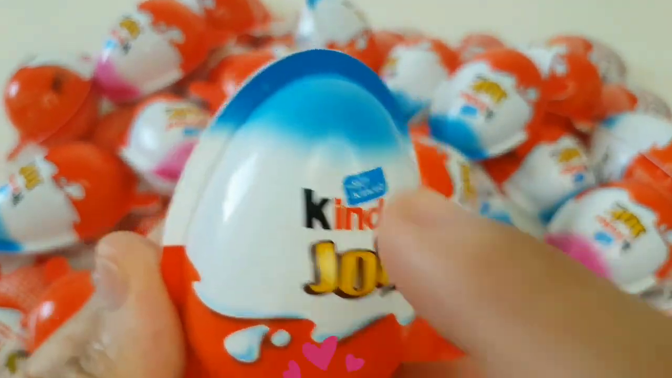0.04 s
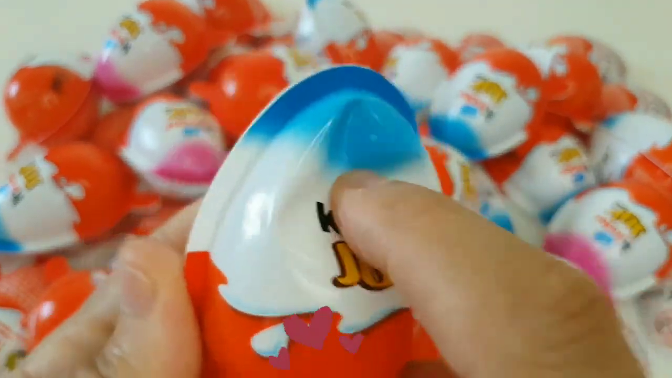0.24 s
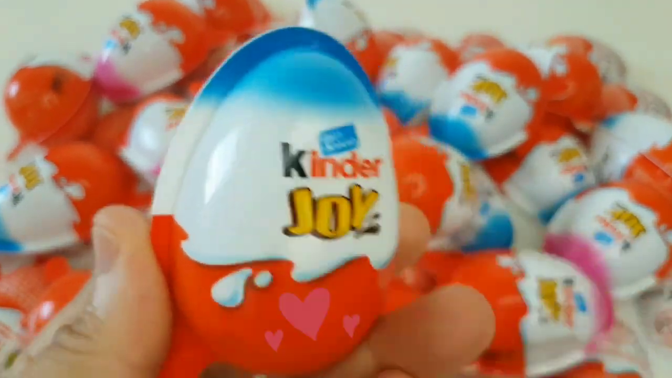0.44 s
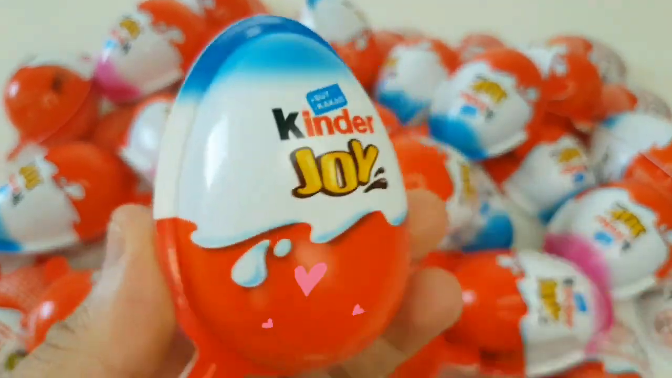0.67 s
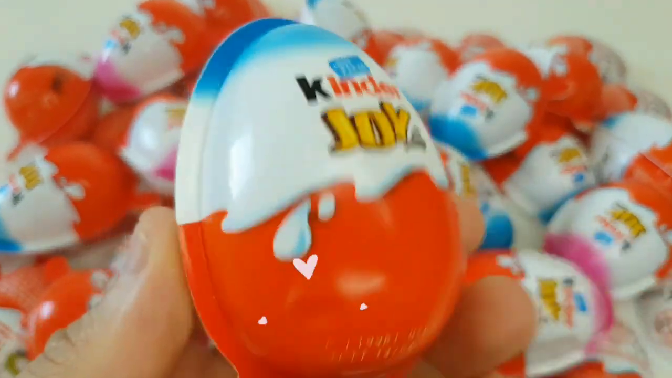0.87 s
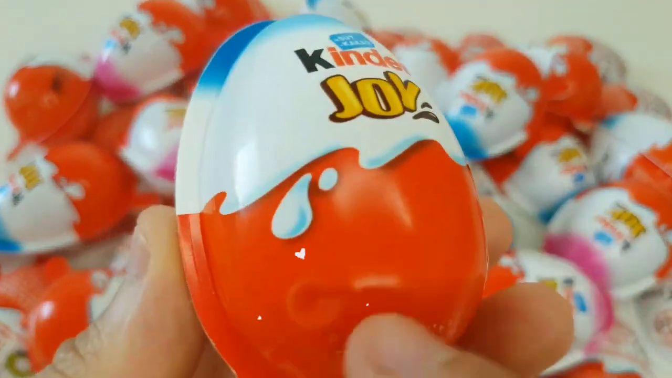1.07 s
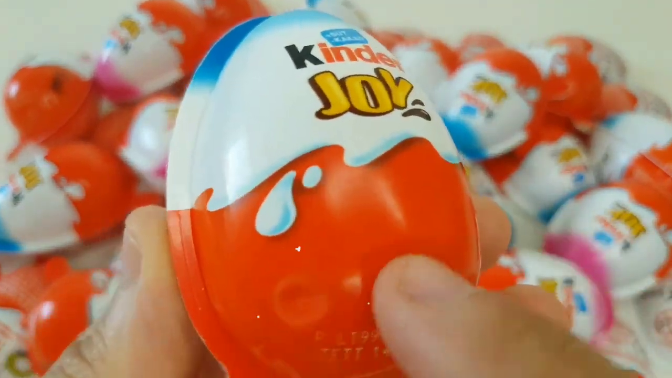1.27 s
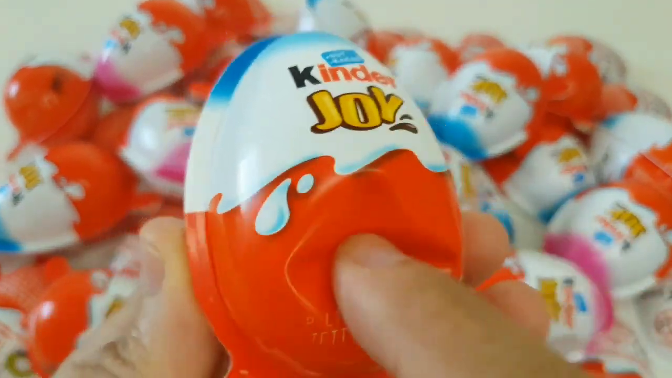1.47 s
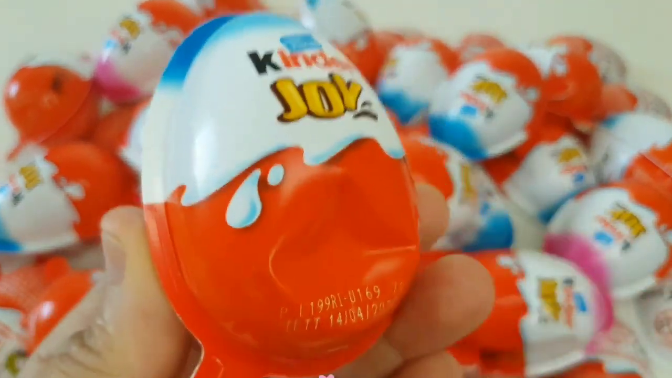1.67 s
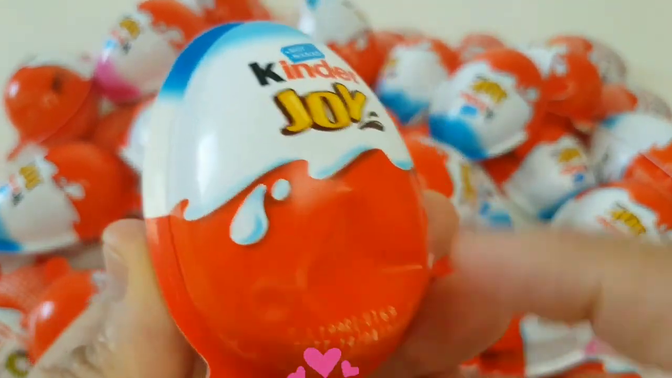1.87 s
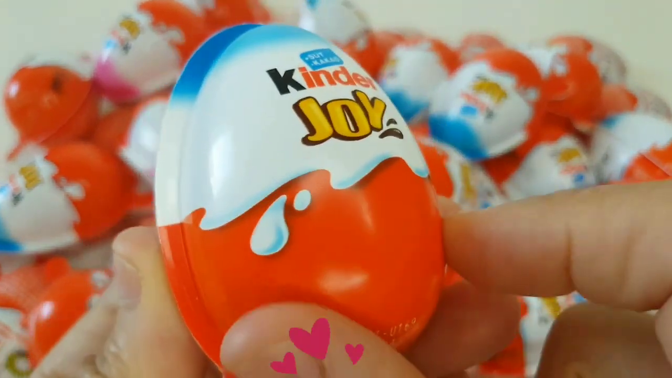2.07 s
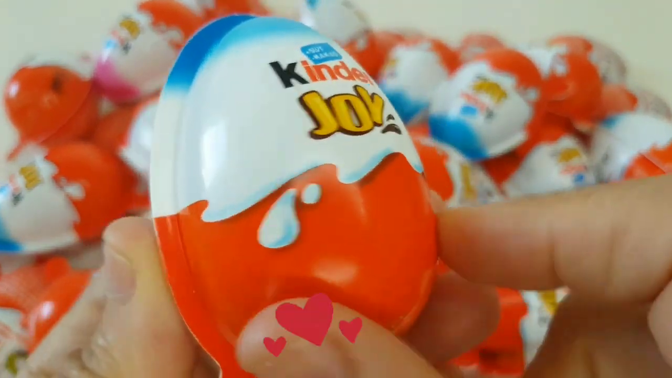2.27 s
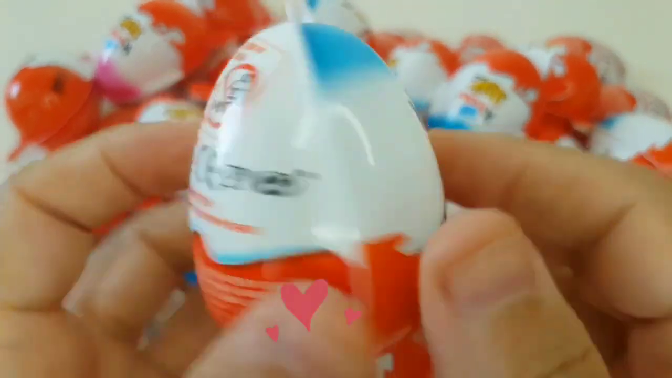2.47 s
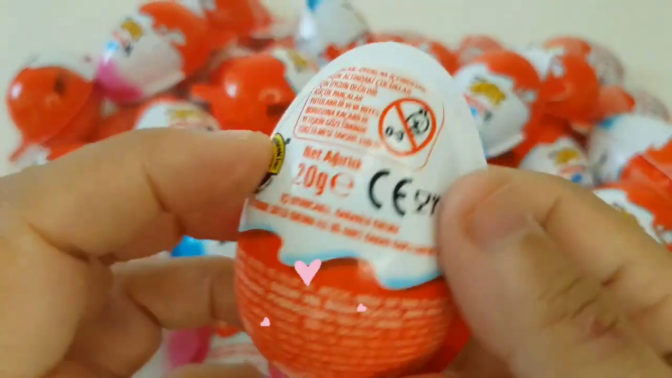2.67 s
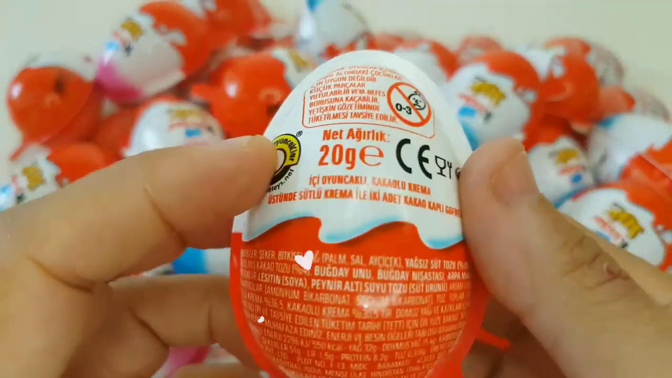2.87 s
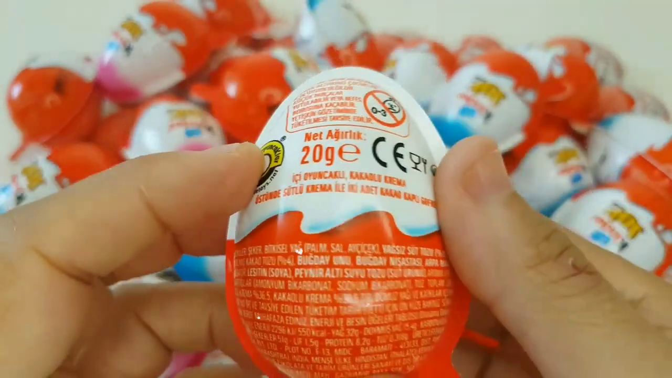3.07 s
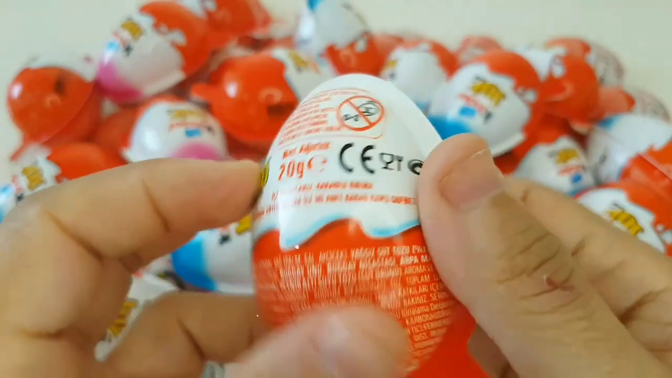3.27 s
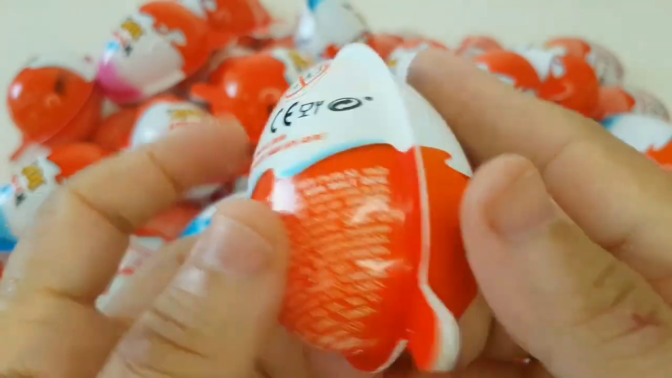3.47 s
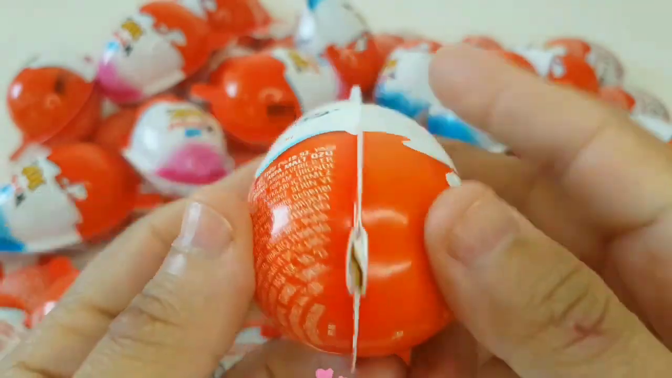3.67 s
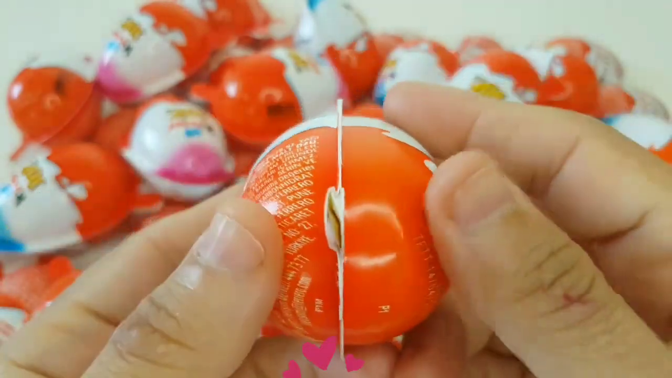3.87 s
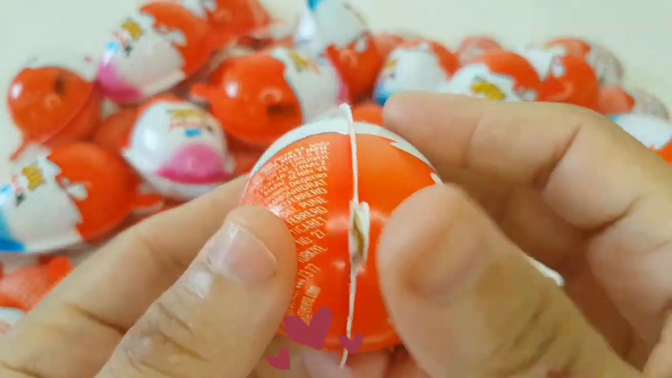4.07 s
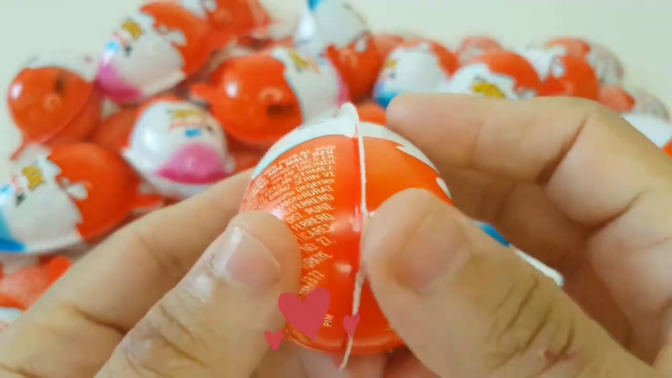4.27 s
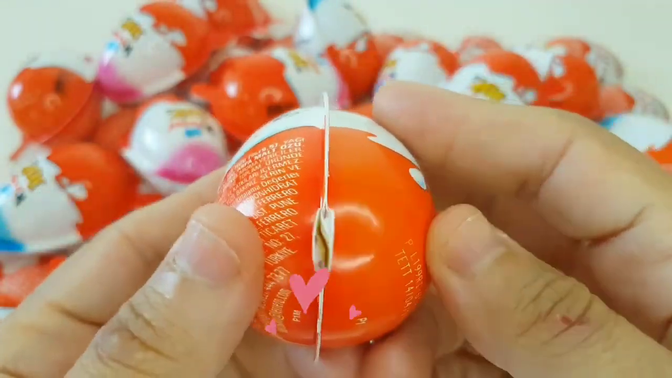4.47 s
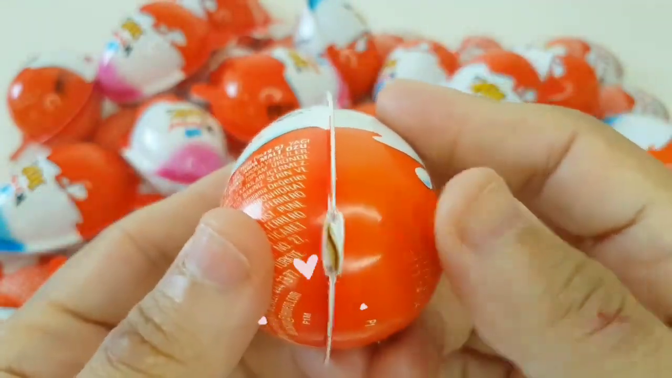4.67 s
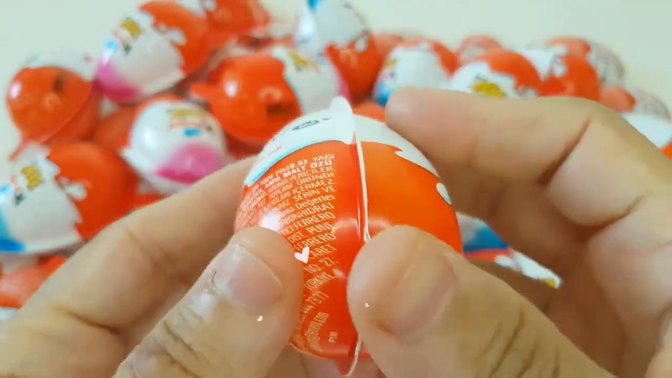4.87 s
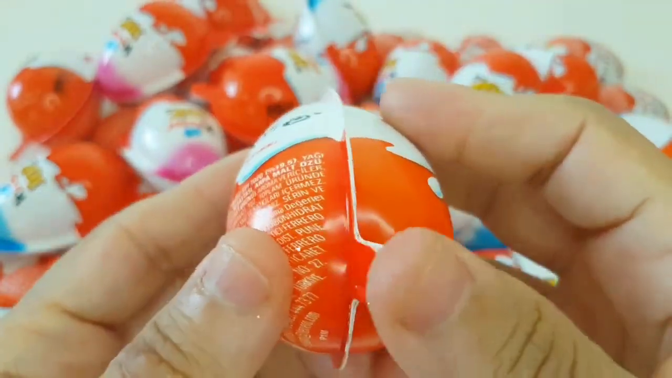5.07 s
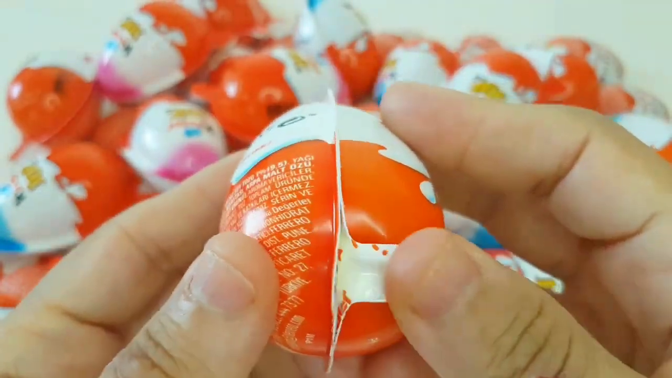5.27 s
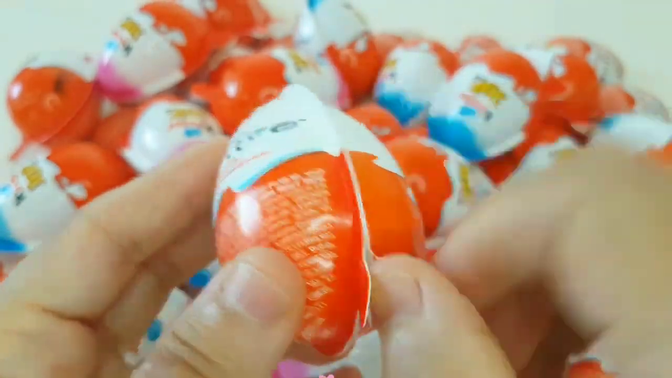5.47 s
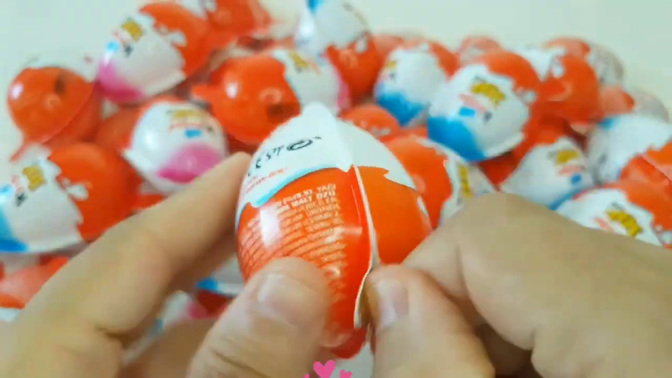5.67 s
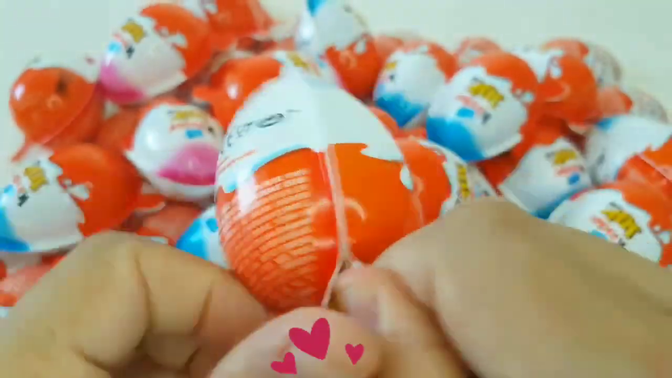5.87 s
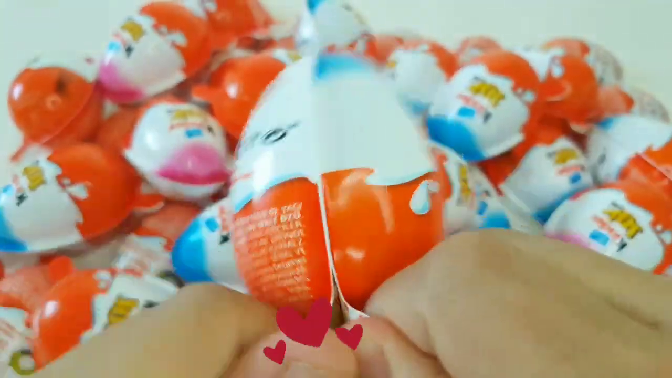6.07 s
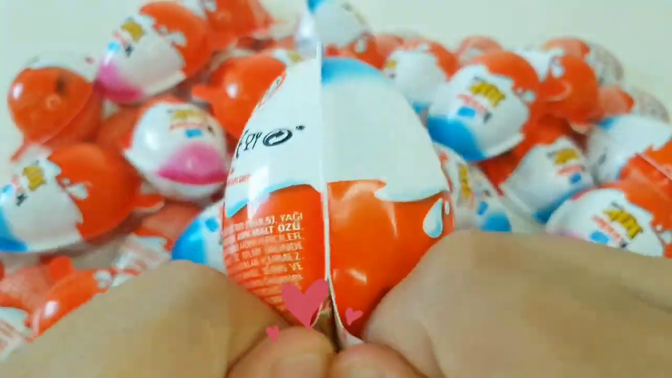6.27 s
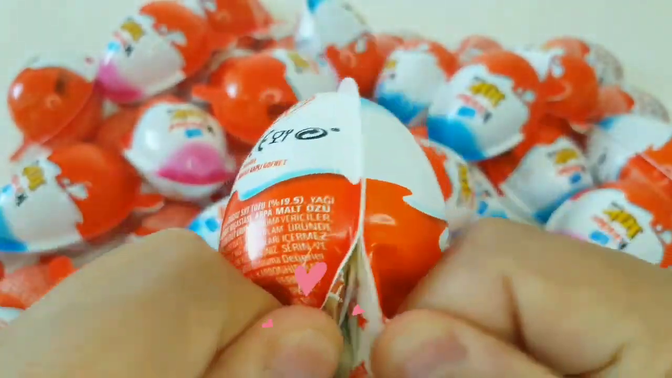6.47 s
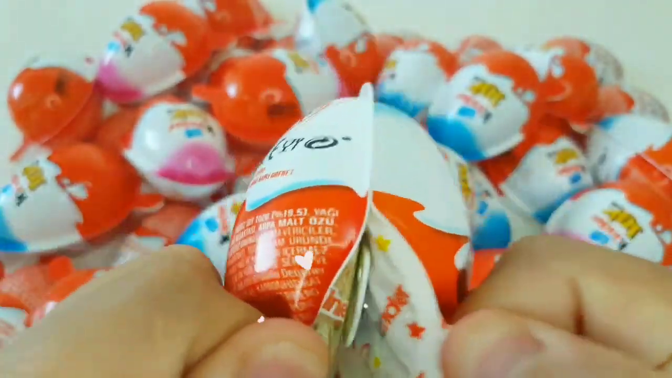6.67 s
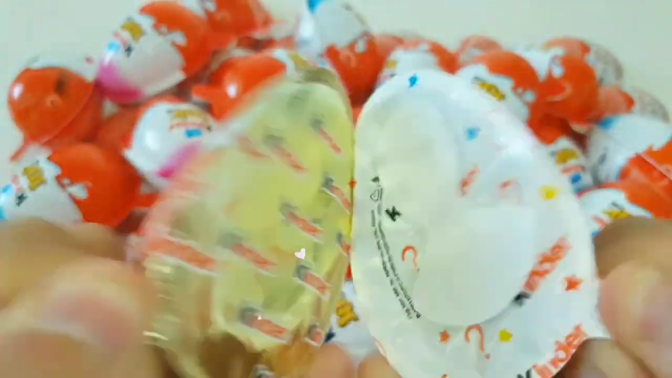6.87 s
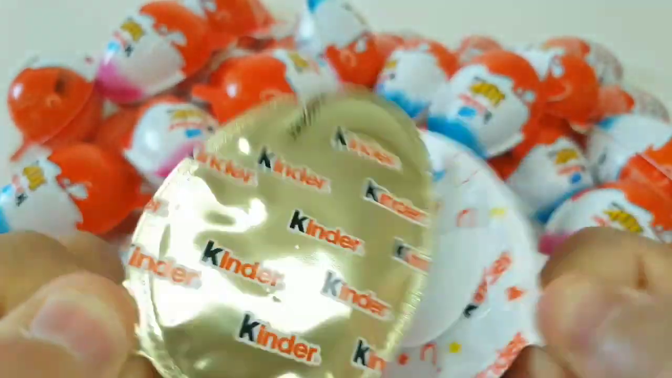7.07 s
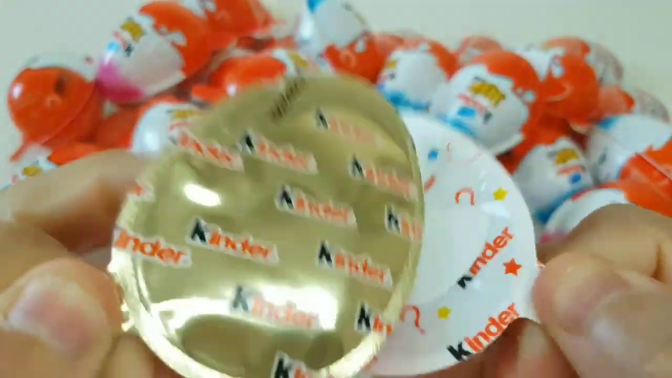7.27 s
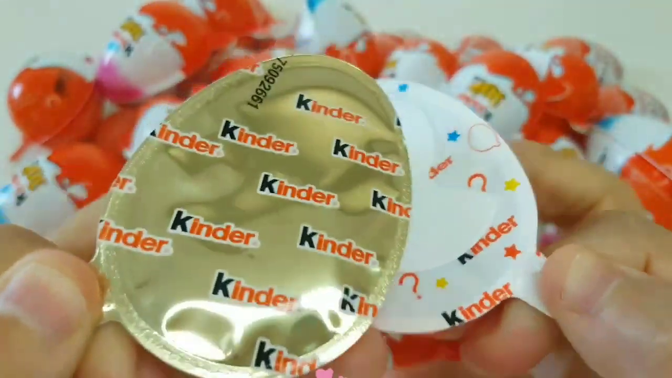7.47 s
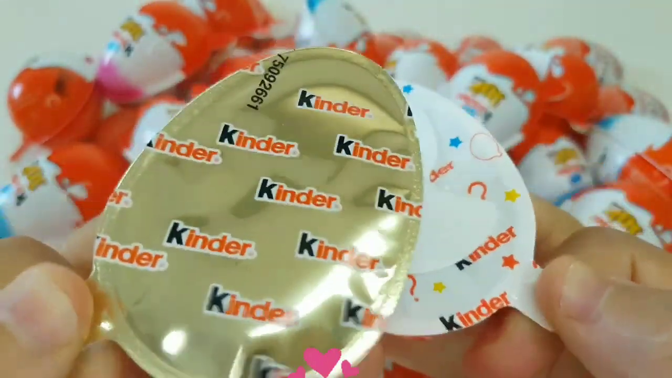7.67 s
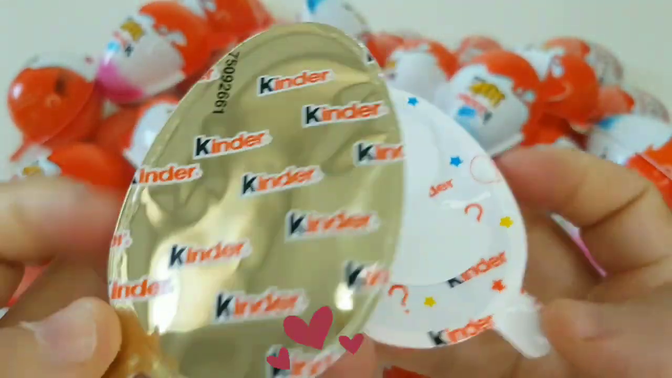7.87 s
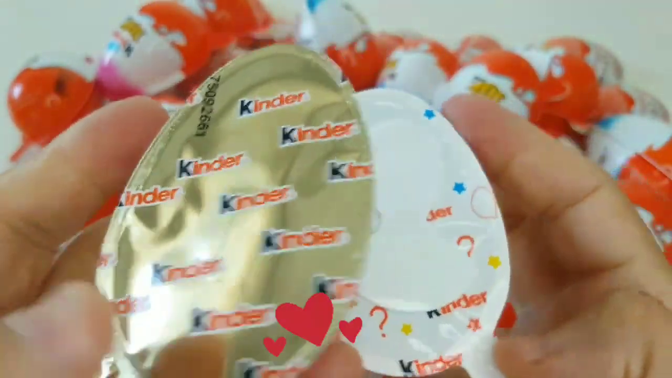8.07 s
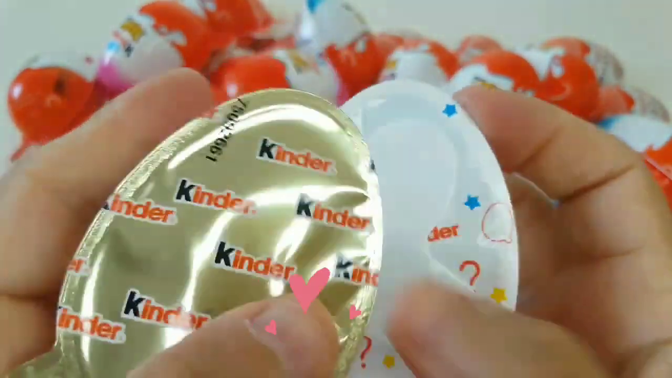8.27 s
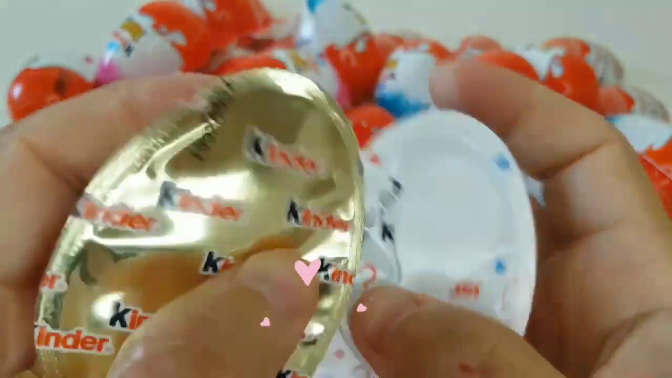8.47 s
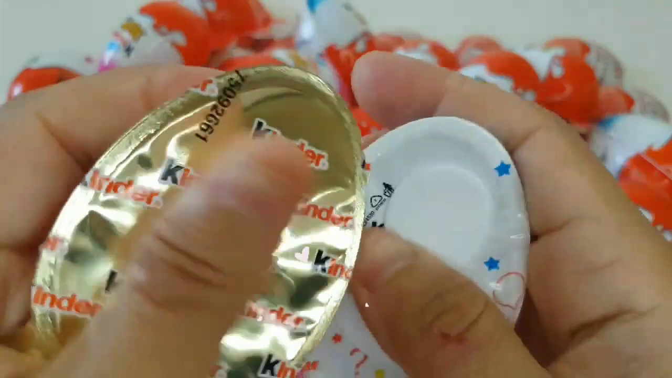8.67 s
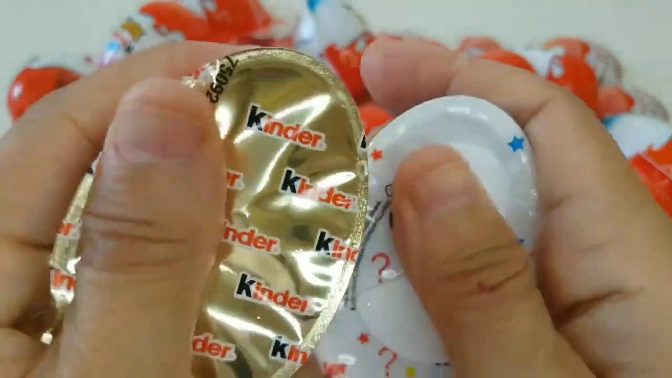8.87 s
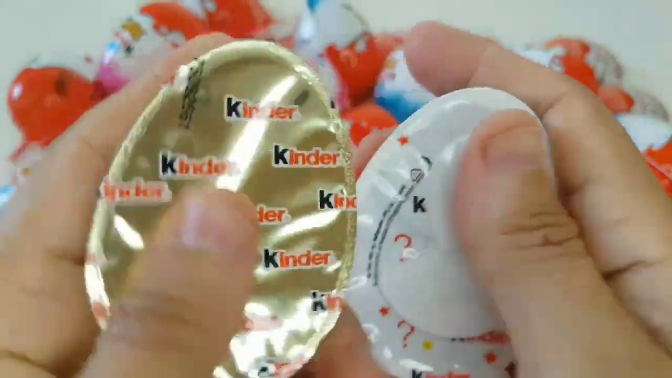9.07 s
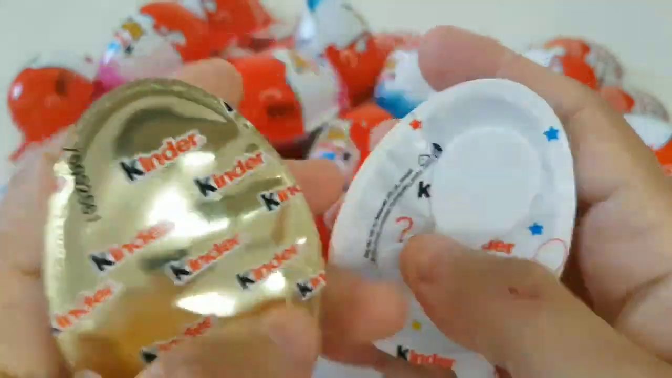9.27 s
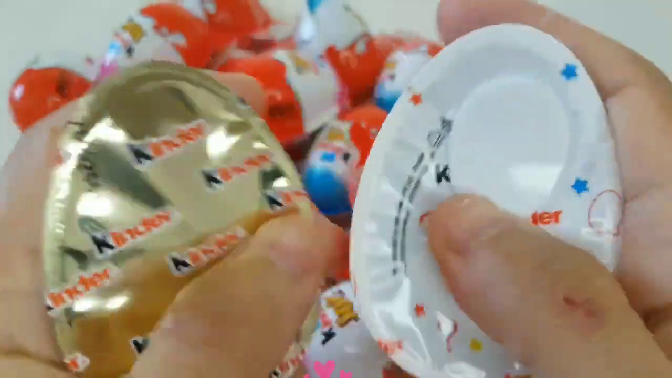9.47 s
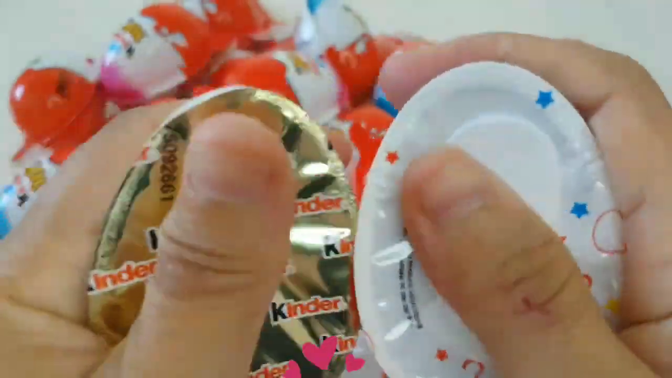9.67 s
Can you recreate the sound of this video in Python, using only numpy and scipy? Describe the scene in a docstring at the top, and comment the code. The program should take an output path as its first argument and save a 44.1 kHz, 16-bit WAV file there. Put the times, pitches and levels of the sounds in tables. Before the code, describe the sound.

Fingers squeeze and rub a thin plastic candy egg, making scattered sharp snaps and hollow pops with pauses between them. About two thirds of the way through, the halves come apart in a rush of loud snaps and a scrape. Thumbs then press the foil lids, which crackle steadily to the end. It is all close to a stereo microphone in a small, quiet room with a brief echo.

```python
"""Close to a stereo microphone in a small, quiet room, hands squeeze a thin plastic egg: creases snap,
the hollow shell pops and skin rubs on the plastic. From 6.3 s the halves come apart in a rush of snaps
and pops. From 8.1 s thumbs press the foil lids, which crackle with less sparkle.
All along the room echoes briefly over a faint hush, and the loudest snaps clip."""
import sys
import numpy as np
from scipy import signal
from scipy.fft import rfft, irfft, next_fast_len
from scipy.io import wavfile
from scipy.ndimage import uniform_filter1d, map_coordinates

SR = 44100
rng = np.random.default_rng(int(sys.argv[2]) if len(sys.argv) > 2 else 0)


def store_wav(level_fs):
    """Save 16-bit WAV to argv[1]."""
    pcm = np.round(np.clip(np.atleast_2d(level_fs), -1, 1) * 32767)
    wavfile.write(sys.argv[1], SR, pcm.T.astype(np.int16))


N = 429093

# Levels in the tables are relative: the functions add their own gains.
# Creases and dents that buckle: t/s, level/dB, panel note f/Hz, edge crack level/dB
BUCKLES = [(.1942, -31, 3700, -16), (.2214, -35, 1700, -17), (.3233, -31, 3530, -20),
           (.3378, -28.5, 2090, -11), (.355, -42, 3040, -3), (.3754, -29, 990, -5), (.4003, 1.5, 4200, -13),
           (.6553, -41, 5600, 4), (1.451, -29.5, 2393, -20), (1.5637, -26.5, 1860, -32),
           (1.5717, -26.5, 2200, -19), (1.6772, -28, 2200, -18), (1.9699, -1, 1703, -9.5),
           (2.4165, -38, 1500, -6.5), (3.584, -35.5, 2797, -11.5), (3.6189, -34, 906, -15.5),
           (4.2942, -28, 4920, -11), (4.4328, -3.5, 3900, -7.5), (5.1537, -17.5, 3565, -10.5),
           (5.7386, -35, 2580, -16.5), (5.8965, -30, 650, -18.5), (5.9613, -32, 3530, -26),
           (6.2341, -31, 6980, 27), (6.363, -37.5, 2110, -6), (6.4212, -10, 5730, -16),
           (6.5207, -11, 3800, -8), (6.5314, -8, 1850, -11), (6.5443, -1.5, 1570, -7.5),
           (6.5555, -3.5, 1710, -16.5), (6.6537, 1.5, 1680, -18.5), (6.6703, -12, 4800, -15),
           (6.682, -9, 1540, -19), (6.728, -18, 3070, 7), (6.7577, -14.5, 3190, 1), (6.7626, -6, 1620, -9),
           (6.8447, 8, 1380, -22), (6.8528, -5.5, 950, -22.5), (6.8675, -8, 1590, -42),
           (6.8799, -9, 1410, -13.5), (6.9973, -10, 1650, -7.5), (7.0389, -15.5, 1880, -33.5),
           (7.1236, -26.5, 1120, -21), (7.1273, -31, 2680, -20), (7.1466, -12.5, 3340, -8.5),
           (7.202, -22.5, 1380, -24), (7.6126, -30.5, 1420, -35.5), (8.169, -31.5, 2730, 1.5),
           (8.1898, -31, 3530, 4), (8.203, -17.5, 2000, -42), (8.2268, -13, 1720, -22),
           (8.2339, -20.5, 1380, -22), (8.268, -12, 1480, -14.5), (8.2722, -14.5, 1950, -13),
           (8.3229, -12.5, 1780, -29), (8.3364, -17, 1020, -34), (8.3773, -11, 2160, -25.5),
           (8.4264, -25, 795, -30), (8.485, -11.5, 1880, -29), (8.5018, -16, 3360, -29),
           (8.5862, -30.5, 760, -25), (8.6215, -29, 1920, -50), (8.6435, -23.5, 1700, -47),
           (8.6613, -18, 1560, -32), (8.6649, -10, 2220, -14), (8.6801, -16, 2050, -9.5),
           (8.708, -15, 1330, -25), (8.723, -20.5, 3000, -25), (8.7313, -15.5, 1450, -47),
           (8.7514, -13, 1750, -18), (8.7937, -8, 1700, -10.5), (8.811, -17, 1520, -29),
           (8.8411, -18, 1630, -20), (8.9145, -18, 2500, -18), (8.938, -11.5, 5650, -9),
           (8.9646, -21, 1690, -19), (9.0016, -11, 1810, -27), (9.12, -19.5, 5300, -9),
           (9.08, -31, 1810, -7), (9.168, -15, 2170, -17), (9.1827, -10.5, 2250, -9),
           (9.2653, -23.5, 1630, -16), (9.3307, -22.5, 1760, -26), (9.3349, -10.5, 2230, -11.5),
           (9.3795, -20.5, 1230, -17.5), (9.4282, -9, 1290, -34), (9.4388, -11.5, 2470, -24),
           (9.489, -16.5, 2370, -6), (9.5001, -8, 2200, -20.5), (9.5587, -18, 1890, -23),
           (9.586, -13.5, 2350, -14), (9.6096, -9, 1490, -24), (9.637, -20, 2180, -23),
           (9.689, -19, 805, -3.5), (9.7007, -11.5, 3200, 18)]
# The whole shell jumps: t/s, hollow level/dB, crack level/dB, top treble boost/dB
SHELL_JUMPS = [(.396, -22.5, -13, 0), (1.56, -52, -43, 2), (1.965, -16, -14, -4.5),
               (4.428, -23, -11.5, 4.5), (5.151, -36, -33.5, 6), (5.893, -37, -40, -2),
               (6.42, -48.5, -18.5, -2), (6.652, -23.5, -9.5, -4.5), (6.844, -11.5, -25, -2.5),
               (6.864, -21.5, -33.5, -2.5), (6.995, -34.5, -33, 4), (7.145, -44.5, -28.5, 2)]
# Tone of a pop's crack in the room: f/Hz, level/dB
CRACK_TONE = [(100, -17), (330, -4.5), (450, 2.5), (620, -3), (870, 1), (1500, -3), (2500, 2.5), (3800, 2),
              (5500, -1.5), (8000, -0.5), (13000, 1.5), (16000, -5.5)]
# Strokes of skin and foil: strongest at t/s, length/s, level/dB, hiss over scrape/dB
STROKES = [(0.172, 0.01, -59.5, 6), (0.202, 0.022, -50, 2), (0.341, 0.048, -51.5, -8),
           (.65, 0.039, -54.5, 5), (0.767, 0.06, -69, 1.5), (1.035, .037, -68, 6.5), (1.41, 0.062, -58, -6),
           (1.572, .018, -42, 3), (2.434, 0.083, -62.5, -3.5), (2.629, 0.045, -58, -7),
           (3.312, 0.066, -52.5, -1), (3.379, 0.11, -55.5, -1), (3.599, 0.086, -50.5, -10),
           (3.682, 0.045, -56, 4.5), (5.35, 0.048, -65.5, -1.5), (5.535, 0.049, -57.5, 3.5),
           (5.619, 0.15, -66, 2.5), (5.74, 0.027, -49, -4), (5.906, .029, -38, -12),
           (6.09, 0.066, -61, 5.5), (6.165, 0.024, -57, -11), (6.541, .03, -27.5, 5),
           (6.862, 0.053, -22.5, -10), (6.923, 0.16, -36.5, -27), (7.433, 0.082, -60.5, -19.5),
           (7.557, 0.068, -62.5, -13), (7.715, 0.057, -51, -8), (7.831, 0.086, -48.5, -11.5),
           (7.91, 0.098, -58, -12.5), (8.03, 0.12, -66, -14), (8.347, 0.43, -43.5, -10),
           (8.492, 0.03, -28, -12), (8.733, .34, -45.5, -28), (8.852, 0.042, -52, 7),
           (9.116, 0.029, -45.5, 12.5), (9.252, 0.035, -36.5, -11), (9.438, 0.46, -47, -6.5),
           (9.7, 0.014, -42.5, 11)]
# Tone of the rubbed shell: f/Hz, level/dB
SCRAPE_TONE = [(150, -25), (400, -7), (900, -5), (1400, -2.5), (2100, -0.5), (3000, -5), (6000, -19.5),
               (9000, -32.5)]
# Tone of the rubbed surface: f/Hz, level/dB
HISS_TONE = [(2000, -22.5), (5000, 1), (9000, -2.5), (13000, -2.5), (16000, -5)]
# Time the echo takes to fade by 60 dB: f/Hz, t/s
ECHO_FADE = [(100, 0.48), (260, 0.87), (500, 0.41), (2000, 0.39), (6000, 0.37), (13000, 0.26)]
# Tone of the echo: f/Hz, level/dB
ECHO_TONE = [(100, 1), (400, 3), (1500, 1.5), (2200, 3), (3000, 3), (13000, -0.5)]
# The background rises and sinks: t/s, level/dB
HUSH_LEVEL = [(0, -74), (.3, -82.5), (0.899, -80.5), (1.4, -76), (3.499, -74), (4.9, -76), (6.3, -70.5),
              (7.349, -87.5), (8, -76), (9.73, -63)]
# Tone of the background: f/Hz, level/dB
HUSH_TONE = [(18, -50), (30, -17), (100, -13), (174, -13), (204, -10), (328, -7.5), (801, -13.5),
             (1910, -15.5), (2060, -19.5), (3580, -19), (4780, -26.5), (14800, -26.5), (16000, -33)]
# How alike the background is left and right: f/Hz, likeness (1 = the same)
HUSH_LIKENESS = [(40, 0.77), (130, .3), (600, 0.053)]

PARTED_S, THUMBED_S = 6.3, 8.1  # the halves come apart; thumbs start on the foil
CLOSED_FIZZ_DB, PARTING_FIZZ_DB, FOIL_FIZZ_DB = -2.5, -6, -21  # a snap's top treble over its edge crack
KNOCK_DB, PUSH_DB, WALLS_DB = 36, 29, 17.5  # gains for a pop's ring, air push and echo
TREBLE_HZ, TOP_HZ = 10000, 15600  # where a pop's top treble starts; the highest pitch kept


def snaps():
    """Each buckle is a tiny burst that rings its panel (a patch of shell) and cracks along its edge."""
    near, to_walls = np.zeros((3, N + SR)), np.zeros(N + SR)
    t = np.arange(700) / SR - .003
    burst = np.where(t < 0, amp(60 * t / .0025), amp(-60 * t / .004) + .17 * amp(-60 * t / .02))
    for s, db, panel_hz, edge_db in [*BUCKLES, *ticks(per_stroke=2)]:
        fizz_db = CLOSED_FIZZ_DB if s < PARTED_S else PARTING_FIZZ_DB if s < THUMBED_S else FOIL_FIZZ_DB
        edge = lambda f: amp(edge_db) * (band(f, 3000, 4200) ** 2
                                         - amp(fizz_db) * band(f, 12500, 15000) ** 2)
        panel = lambda f: band(f, panel_hz, .89 * panel_hz) ** 3 + .35 * band(f, 1000, 1600) ** 3
        dull = lambda f: 1 / (1 + 1j * f / (2 * panel_hz)) ** 2  # a panel is weak far above its note
        click = filtered(burst * rng.standard_normal((3, len(t))), lambda f: dull(f) * panel(f) - edge(f))
        peak = np.sqrt(uniform_filter1d(click ** 2, size=60).max(1, keepdims=True))
        click = amp(db - 4) * click / peak
        near[:, round((s + t[0]) * SR):][:, :len(t)] += click
        # a smoother click of the same energy flies off to the walls
        smooth_tone = lambda f: 1.2 * np.abs(band(f, panel_hz, .37 * panel_hz)) ** 3 + np.abs(edge(f))
        smooth = filtered(1. * (t == t[0]), smooth_tone)
        to_walls[round(s * SR):][:len(t)] += smooth / np.linalg.norm(smooth) * np.linalg.norm(click[0])
    return microphone(near[:, :N], own_share=.51, left_db=5, lag_s=.00017), to_walls[:N]


def pops():
    """The hollow shell rings, shoves air at the left microphone and fills the room with a crack."""
    hollow, push = np.zeros((2, N))
    echo, t = np.zeros((2, N + SR)), np.arange(2 * SR // 5) / SR
    for s, hollow_db, crack_db, top_db in SHELL_JUMPS:
        i = round((s + .0022) * SR)
        hollow[i], push[i] = amp(hollow_db + KNOCK_DB), amp(hollow_db + PUSH_DB)
        low = unit(filtered(rng.standard_normal((2, len(t))), lambda f: band(f, 187, 13) ** 2))
        hum = (s < PARTED_S) * amp(-60) * np.exp(-((t - .12) / .11) ** 2) * low  # closed egg only
        crack = echo_tail([(hz, db + top_db * (hz > TREBLE_HZ)) for hz, db in CRACK_TONE], bend=1.305)
        echo[:, i:i + len(t)] += amp(crack_db + WALLS_DB) * (crack + hum)
    ring = filtered(hollow, lambda f: band(f, 340, 170) + .9 * band(f, 455, 12))  # knock + thin ring
    shove = filtered(push, lambda f: band(f, 120, 440) / (1 + 1j * f / 250))
    return ring * amp([[4], [-6]]) + shove * amp([[5], [-9]]) + echo[:, :N]


def rubbing():
    """Each stroke swells fast and fades; tiny slips roughen its scrape more than its hiss."""
    t = np.arange(N) / SR
    scrape_gain, hiss_gain = np.zeros((2, N))
    for s, length, db, hiss_db in STROKES:
        width = length * np.where(t < s, .35, .65)
        stroke = np.exp(-np.clip((t - s) / width, -6, 6) ** 2)
        scrape_gain += amp(db) * stroke
        hiss_gain += amp(db + hiss_db) * stroke
    slipping = rng.random(N) < 350 / SR  # about 350 slips a second
    slips = slipping * amp(4.5 * np.minimum(rng.exponential(size=N), 3))
    grip = 1.2 + signal.fftconvolve(slips, amp(-60 * t[:500] / .006))[:N]
    grip = unit(grip * amp(1.2 * wobble(60)))
    scrape = unit(filtered(grip * rng.standard_normal((3, N)), lambda f: amp(along(SCRAPE_TONE, f))))
    hiss = unit(filtered(np.sqrt(grip) * rng.standard_normal((3, N)), lambda f: amp(along(HISS_TONE, f))))
    return microphone(scrape_gain * scrape + hiss_gain * hiss, own_share=.76, left_db=1.5, lag_s=.00018)


def ticks(per_stroke):
    """A fading stroke sets off small buckles of random size and note, in rows like BUCKLES."""
    s, length, db, _ = np.repeat(STROKES, per_stroke, axis=0).T
    late, size, octaves = rng.standard_normal((len(s), 3)).T
    times = np.minimum(s + .37 * length * abs(late), N / SR)
    level_db = db + 10 + 3.5 * size - 3 * late ** 2  # later ticks are softer
    panel_hz = 1930 * 2 ** np.clip(octaves, -2, 2)
    edge_db = np.full(len(s), -19)
    return np.transpose([times, level_db, panel_hz, edge_db])


def room(x):
    """The walls answer each half second of sound with a new random echo."""
    out, step = np.zeros((2, N + SR)), SR // 2
    for i in range(0, N, step):
        echo = signal.fftconvolve(x[None, i:i + step], echo_tail(ECHO_TONE, bend=.65), axes=1)
        out[:, i:i + echo.shape[1]] += echo
    return out[:, :N]


def echo_tail(tone, bend):
    """One stereo echo: each pitch dies at its own speed; a bend over 1 holds first, then drops."""
    size = 2 * SR // 5
    hz, t, noise = signal.stft(rng.standard_normal((2, size)), SR, nperseg=512)
    fade_db = 60 * (t / along(ECHO_FADE, hz)[:, None]) ** bend
    shape = amp(along(tone, hz)[:, None] - fade_db)
    echo = signal.istft(noise * shape, SR, nperseg=512)[1][:, :size]
    echo *= 1 - np.exp(-np.arange(size) / SR / .001)  # the first walls answer after a few ms
    return echo / np.linalg.norm(echo[0])


def hush():
    """Room air and microphone hiss, alike on both sides only in the bass."""
    angle = lambda f: np.arccos(np.clip(along(HUSH_LIKENESS, f), -1, 1)) / 2
    tone = lambda f: amp(along(HUSH_TONE, f)) * [np.cos(angle(f)), np.sin(angle(f))]
    mid, side = filtered(rng.standard_normal((2, N)), tone)
    s, db = np.transpose(HUSH_LEVEL)
    level_db = np.interp(np.arange(N) / SR, s, db) + 10.5 + .76 * wobble(1.8)
    return amp(level_db) * unit(np.array([mid + side, mid - side]))


def microphone(near, own_share, left_db, lag_s):
    """Both sides hear row 0 plus a row of their own; the nearer left side is earlier and louder."""
    pair = np.sqrt(1 - own_share) * near[0] + np.sqrt(own_share) * near[1:]
    delay = lambda f: np.exp(-2j * np.pi * f * np.array([[0], [lag_s]]))
    return filtered(pair, delay) * amp([[left_db / 2], [-left_db / 2]])


def amp(db):
    """Turn decibels into a number to multiply by."""
    return 10 ** (np.asarray(db) / 20)


def unit(x):
    """Scale a sound to an average power of 1."""
    return x / np.sqrt(np.mean(x ** 2) + 1e-20)


def along(points, hz):
    """Read between a table's rows on a pitch (log) scale."""
    f, v = np.transpose(points)
    return np.interp(np.log(hz + 1), np.log(f + 1), v)


def filtered(x, response):
    """Multiply each frequency f in x by response(f)."""
    n = x.shape[-1]
    m = next_fast_len(n + 2048)
    return irfft(rfft(x, m) * response(np.fft.rfftfreq(m, 1 / SR)), m)[..., :n]


def band(f, centre_hz, width_hz):
    """A filter that rings at one note: the narrower, the longer."""
    return 1j * f * width_hz / (centre_hz ** 2 - f * f + 1j * f * width_hz)


def wobble(rate):
    """A smooth curve through `rate` random points a second."""
    return map_coordinates(rng.standard_normal(int(N * rate / SR) + 4), [np.arange(N) * rate / SR])


def scene():
    """Add up the egg's sounds, their echo and the background."""
    snap, snap_to_walls = snaps()
    rub = rubbing()
    return snap + pops() + rub + room(amp(-13) * snap_to_walls + amp(-16) * rub[0]) + hush()


def record(dry):
    """The converter clips the loudest peaks, sits a little off zero and cuts everything above TOP_HZ."""
    clipped = dry / (1 + np.abs(dry) ** 8) ** (1 / 8) - .0007
    padded = np.pad(clipped, ((0, 0), (2000, 2000)), "edge")
    return filtered(padded, lambda f: amp(-np.clip((f - TOP_HZ) / 22, 0, 90)))[:, 2000:-2000]


dry = scene()
out = record(dry)
store_wav(out)
```